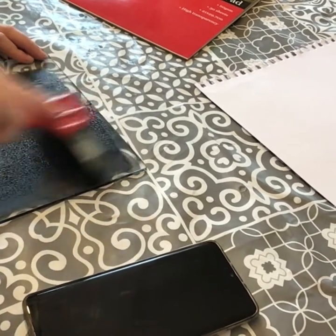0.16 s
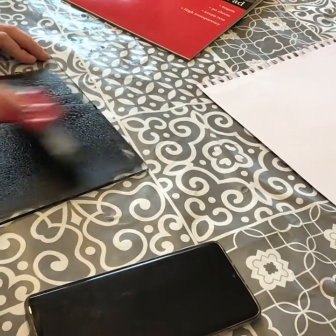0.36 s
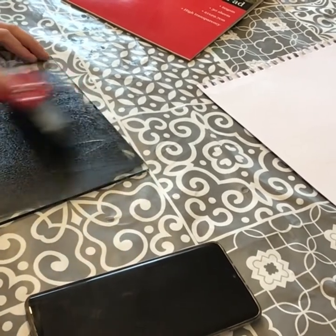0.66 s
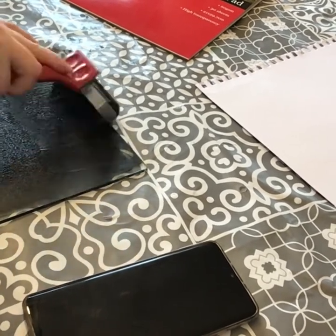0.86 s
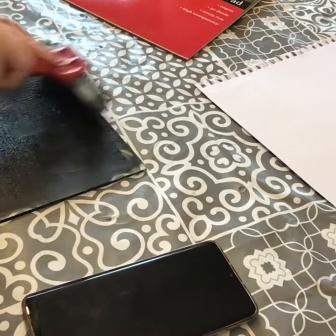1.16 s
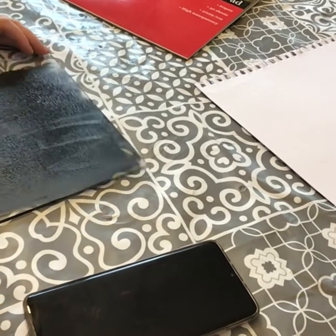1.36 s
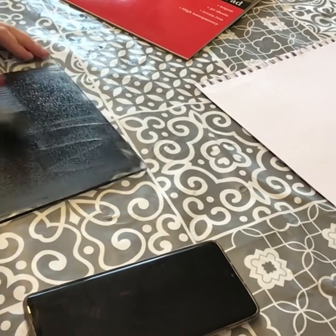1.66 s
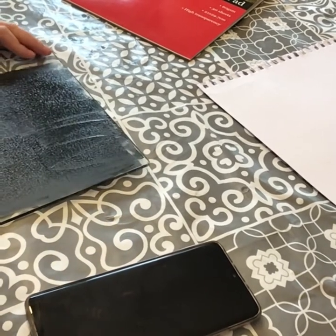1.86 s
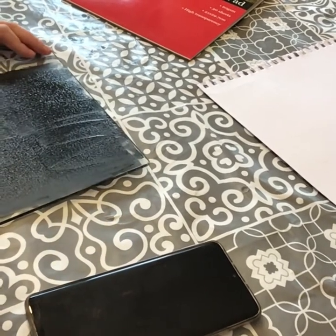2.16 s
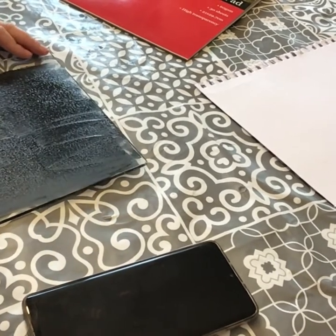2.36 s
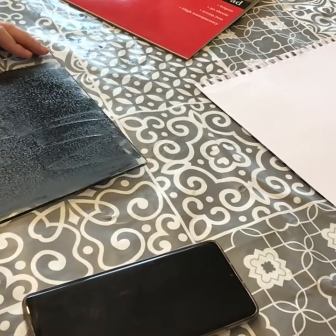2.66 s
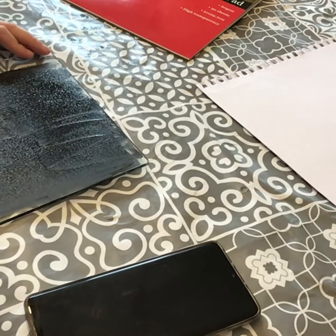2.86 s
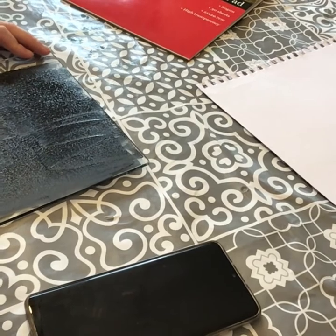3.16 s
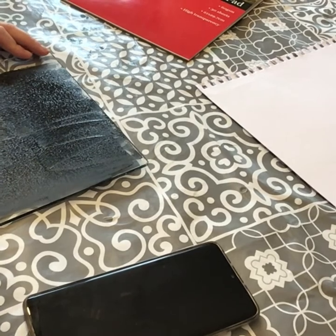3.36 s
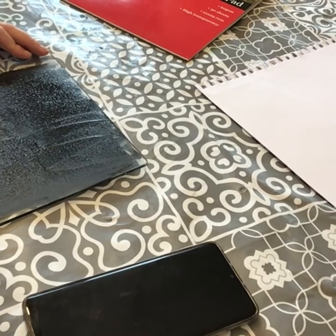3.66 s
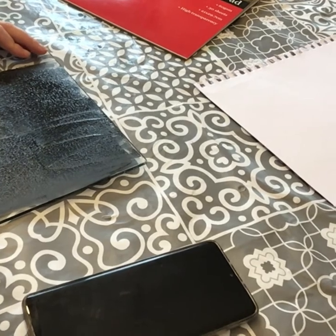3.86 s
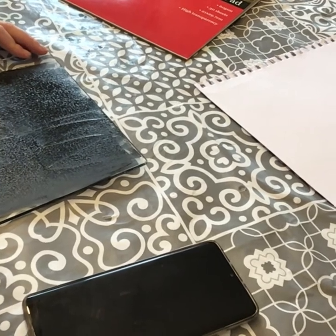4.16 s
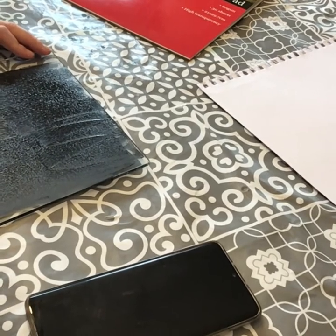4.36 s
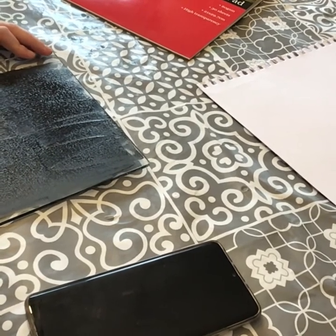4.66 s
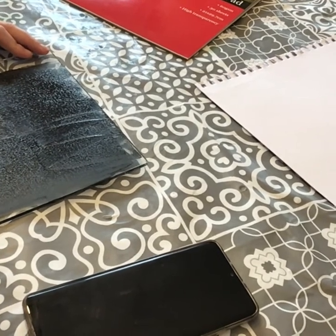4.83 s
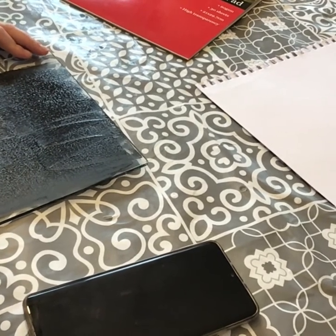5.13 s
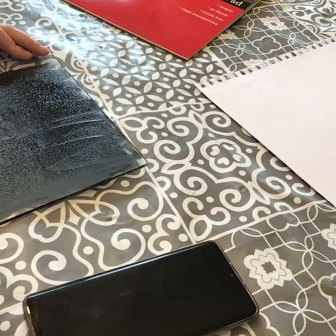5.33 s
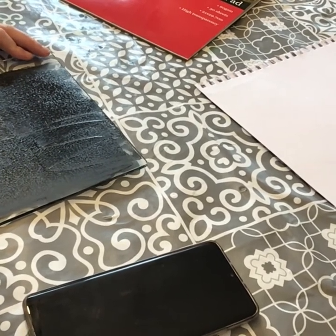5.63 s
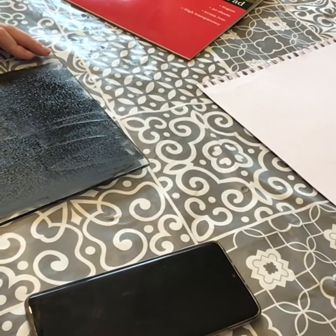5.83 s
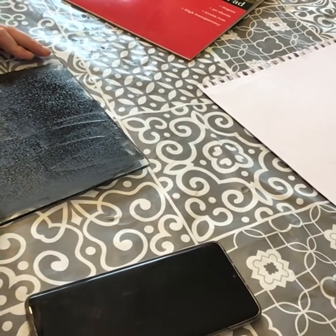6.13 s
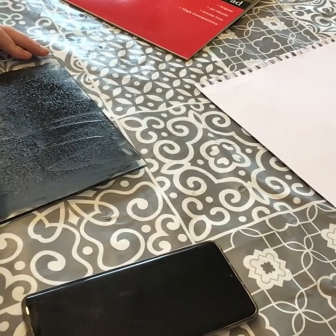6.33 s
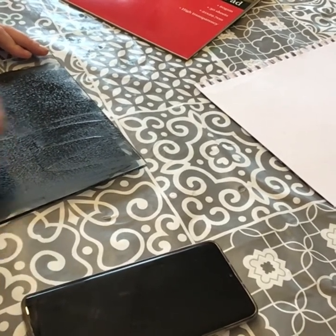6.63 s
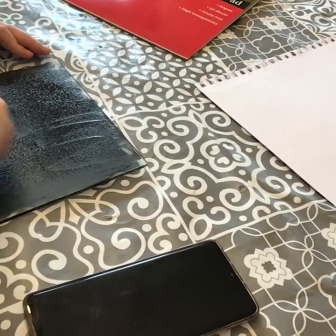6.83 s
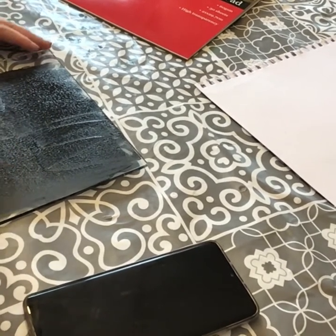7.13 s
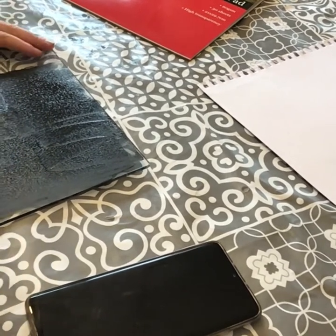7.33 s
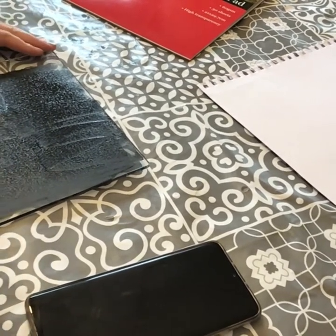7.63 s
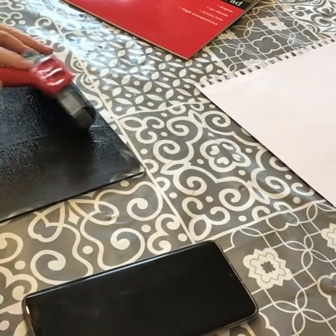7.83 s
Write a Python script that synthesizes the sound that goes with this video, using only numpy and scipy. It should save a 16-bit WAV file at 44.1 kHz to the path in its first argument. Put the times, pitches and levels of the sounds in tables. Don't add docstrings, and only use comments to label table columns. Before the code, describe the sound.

Close to the microphone in a small quiet room, a rubber roller works sticky ink on glass with fast crackling rasps, about six a second. It lifts with tiny ticks, lands with a knock, continues with gradually fainter strokes, pauses, then the handle clacks on the plate, the roller lands again and makes two longer tearing strokes.

```python
import sys
import numpy as np
from scipy import signal
from scipy.fft import rfft, irfft, next_fast_len
from scipy.io import wavfile
from scipy.ndimage import uniform_filter1d, map_coordinates

SR = 44100
rng = np.random.default_rng(int(sys.argv[2]) if len(sys.argv) > 2 else 0)


def to_wav(sig):
    pcm = np.clip(np.atleast_2d(sig), -1, 1) * 32767
    pcm = np.round(pcm).astype(np.int16)
    wavfile.write(sys.argv[1], SR, pcm.T)


def field_ratio(decibels):
    return 10 ** (np.asarray(decibels, dtype=float) / 20)


N = 352359

# f/Hz, width/Hz, level/dB
SLAB = [(171.8, 7.7, 3), (221.7, 12, 2), (255.4, 17, -1), (280, 35.6, -1)]


def unit(x):
    return x / np.sqrt(np.mean(x ** 2) + 1e-20)


def along(points, hz):
    f, v = np.transpose(points)
    return np.interp(np.log(hz + 1), np.log(f + 1), v)


def curves(rows):
    s, *columns = np.transpose(rows)
    return [np.interp(np.arange(N) / SR, s, column) for column in columns]


def wobble(rate):
    knots = rng.standard_normal(int(N * rate / SR) + 4)
    return map_coordinates(knots, [np.arange(N) * rate / SR])


def loudest(levels_db):
    return 10 * np.log10((field_ratio(levels_db) ** 2).sum(axis=0) + 1e-14)


def filtered(x, response):
    m = 2 * next_fast_len(N // 2 + SR // 4)
    return irfft(rfft(x, m) * response(np.fft.rfftfreq(m, 1 / SR)), m)[:N]


def causal(spectrum):
    def response(hz):
        cepstrum = irfft(np.log(field_ratio(along(spectrum, hz)) + 1e-6))
        cepstrum[1:len(hz) - 1] *= 2
        cepstrum[len(hz):] = 0
        return np.exp(rfft(cepstrum))
    return response


def resonant(peaks):
    def response(f):
        total = 0
        for k, (centre, width, db) in enumerate(peaks):
            total = total + (-1) ** k * field_ratio(db) * 1j * f * width / (centre * centre - f * f + 1j * f * width)
        return total
    return response


def bursts(seconds, gains, size=80):
    # f/Hz, scatter as a share
    port = (11590, 0.045)
    # f/Hz, width/Hz, level/dB
    pop_peaks = [(6390, 2120, 5), (14600, 3500, 4)]
    # t/s, pop under the ping level/dB
    tack = [(0, -10.5), (1.5, -7), (3, -7), (4.5, -7.5), (6, -4), (7.99, -7.5)]
    port_hz, scatter = port
    t = np.arange(size) / SR
    shape = 1.9 * (1 - np.exp(-t / .0001)) * np.exp(-t / .0003)
    draw = rng.standard_normal((len(seconds), size + 1))
    ping = np.sin(2 * np.pi * port_hz * np.exp(scatter * draw[:, :1]) * t)
    at = (np.asarray(seconds) * SR).astype(int)[:, None] + np.arange(size)

    def lay(rows):
        snap = gains[:, None] * shape * rows
        return np.bincount(at.ravel(), snap.ravel(), N + SR)[:N]

    pop = filtered(lay(draw[:, 1:]), lambda hz: resonant(pop_peaks)(hz) * hz / (hz - 4500j))
    return lay(ping) + field_ratio(curves(tack)[0]) * pop


def struck(hits, modes, rise_s, crack_s, size=1):
    out, t = np.zeros(N + SR), np.arange(SR // 4) / SR
    for s, db, hard_db, sharp_db in hits:
        ring = np.zeros(len(t))
        for hz, level, t60 in modes:
            mode_db = level + hard_db * np.log2(hz / 1000) + 1.0 * rng.standard_normal()
            ring += field_ratio(mode_db - 60 * t / t60) * np.sin(2 * np.pi * hz * t)
        ring *= 1 - np.exp(-(t / rise_s) ** 2)
        grit = uniform_filter1d(rng.standard_normal(len(t)), size=size) * np.sqrt(size)
        crack = field_ratio(sharp_db - 60 * t / crack_s) * grit
        out[round(s * SR):][:len(t)] += field_ratio(db) * (ring / np.abs(ring).max() + crack)
    return out[:N]


def strokes():
    # t/s, rise/s, hold/s, tearing ink level/dB, frame
    # buzz level/dB
    passes = [(0.002, 0.021, 0.02, -37.5, -54), (0.147, 0.032, 0.025, -37, -53.5),
              (0.315, 0.015, 0.04, -36, -52.5), (0.456, 0.044, 0.004, -30, -51.5),
              (0.603, 0.051, 0.004, -37, -51), (0.768, 0.031, 0.032, -33.0, -54),
              (0.912, 0.015, 0.069, -36, -53), (1.064, 0.072, 0.004, -29.5, -52.5),
              (1.234, 0.023, 0.125, -34.5, -50.5), (1.485, 0.05, 0.036, -37.5, -53),
              (1.657, 0.055, 0.067, -37.5, -50.5), (1.897, 0.051, 0.043, -36, -53),
              (2.106, 0.027, 0.091, -36.5, -51.5), (2.323, 0.014, 0.06, -48.5, -59.5),
              (2.504, 0.041, 0.004, -39.5, -51), (2.615, 0.067, 0.004, -35.5, -51),
              (2.796, 0.0077, 0.035, -32.5, -52), (2.933, 0.065, 0.004, -33, -51.5),
              (3.101, 0.038, 0.008, -33.0, -50), (3.219, 0.079, 0.005, -34.5, -51),
              (3.413, 0.039, 0.004, -31.0, -49.5), (3.558, 0.033, 0.004, -33.5, -49.5),
              (3.734, 0.024, 0.058, -43, -53),
              (4.29, 0.038, 0.042, -34.5, -46.5), (4.457, 0.044, 0.04, -40.5, -49),
                  (4.649, 0.016, 0.064, -35.5, -48), (4.792, 0.042, 0.032, -41.5, -49),
                  (4.971, 0.0274, 0.024, -39.5, -48.5), (5.109, 0.043, 0.038, -40.5, -51),
                  (5.283, 0.032, 0.062, -36.5, -49), (5.497, 0.059, 0.016, -35.5, -48.5),
                  (5.646, 0.032, 0.029, -35, -49.5), (5.795, 0.069, 0.004, -46, -54),
                  (5.924, 0.065, 0.045, -45.5, -56), (6.125, 0.028, 0.014, -44, -54),
                  (6.253, 0.007, 0.052, -48, -58.5), (6.384, 0.032, 0.004, -47, -58),
                  (6.517, 0.043, 0.008, -50, -59.5), (6.632, 0.047, 0.025, -53, -58.5),
                  (6.806, 0.043, 0.006, -48, -56), (6.938, 0.035, 0.065, -45.0, -55.5),
                  (7.594, 0.073, 0.11, -33.5, -50.5), (7.852, 0.06, 0.193, -36.5, -48.5)]
    grip_db, rise_bend = 14.5, 0.58
    bite_db_per_s, sag_db_per_s, fall_db_per_s = 2091.5, 20, 174.5
    stop_db_per_s2 = 1499.5
    frame_swing = 0.75
    early_db = 5.5
    t = np.arange(0, N, 32) / SR
    s, rise, hold, ink_db, frame_db = np.array(passes).T[..., None]
    age = t - s
    late = np.maximum(age - rise - hold, 0)
    to_go = np.clip(1 - age / rise, 0, 1)
    swell_db = bite_db_per_s * np.minimum(age, 0) - grip_db * to_go ** rise_bend
    swell_db -= sag_db_per_s * np.clip(age - rise, 0, hold)
    swell_db -= fall_db_per_s * late + stop_db_per_s2 * late ** 2
    levels = [loudest(ink_db + swell_db), loudest(frame_db + frame_swing * swell_db),
              loudest(swell_db), loudest(ink_db + swell_db + early_db * to_go)]
    return curves(np.transpose([t, *levels]))


def roller(ink_db, frame_db, stray_db):
    # f/Hz, level/dB per Hz
    hiss = [(880, -28), (1500, -8.5), (1940, -14.5), (2540, -13), (3350, -8.5), (4120, -4.5), (4870, -45),
            (6630, -2.5), (9850, 2), (11800, -17), (16000, -1)]
    # f/Hz, width/Hz, level/dB
    frame = [(603, 280, 0), (1046, 243, -2), (1320, 240, 2), (1750, 540, -4.5), (2537, 270, 2),
             (3115, 180, 0), (4095, 540, -1.5)]
    draw = rng.random((20000, 2))
    sizes = field_ratio(-5 * np.log(draw[:, 1] + .05))
    crackle = unit(field_ratio(3.53 * wobble(28)) * bursts(draw[:, 0] * N / SR, sizes))
    fizz = unit(filtered(rng.standard_normal(N), causal(hiss)))
    buzz = unit(filtered(field_ratio(2.3 * wobble(60)) * rng.standard_normal(N), resonant(frame)))
    stray = rng.random((1000, 2))
    thick_db, spread_db = 4.5, 2
    thick = bursts(stray[:, 0] * N / SR, field_ratio(thick_db - spread_db * np.log(stray[:, 1] + 0.022)))
    tearing = field_ratio(ink_db) * (field_ratio(-1.5) * crackle + field_ratio(-11.5) * fizz)
    return tearing + field_ratio(stray_db + 3.9 * wobble(22)) * thick + field_ratio(frame_db - 1.5) * buzz


def snaps():
    # t/s, peak level/dB
    thick_snaps = [(.0453, -19), (.1545, -25), (.1601, -24), (.1793, -20), (.1844, -17), (.2138, -22),
                   (.5054, -16), (.5098, -15), (.7713, -31), (.7808, -22), (.7976, -21), (.9294, -25),
                   (.9571, -22), (1.0154, -25), (1.084, -27), (1.1188, -19), (1.1265, -18), (1.5427, -20),
                   (1.5894, -22), (1.688, -29), (2.1846, -21), (2.3156, -33), (2.3407, -35), (2.3936, -26),
                   (2.5115, -27), (2.7985, -24), (3.111, -26), (3.4429, -24), (3.4652, -16), (3.5746, -26),
                   (3.7425, -34), (3.8029, -24), (4.2963, -26), (4.3145, -24), (4.6619, -29), (4.678, -22),
                   (4.9754, -28), (4.9975, -25), (5.2979, -26), (5.3688, -19), (5.3738, -17), (5.3934, -22),
                   (5.67, -23), (5.9627, -30), (6.2621, -33), (6.2653, -29), (6.3189, -33), (6.324, -33),
                   (6.5472, -38), (6.7334, -43), (6.8035, -32), (6.8243, -33), (6.8443, -32), (6.8509, -29),
                   (7.5797, -26), (7.6188, -29), (7.6419, -25), (7.69, -23), (7.7924, -24), (7.8812, -31)]
    s, db = np.array(thick_snaps).T
    return bursts(s - .00015, field_ratio(db + 1.2))


def knocks():
    # t/s, peak level/dB, hardness/dB per octave, sharp part level/dB, thud level/dB
    landings = [(1.142, -49.5, -34, -26, -13), (2.337, -43, -11, -26, -20), (2.635, -34.5, -1, -28, -19),
                (2.767, -51.5, -5, -26, -24), (2.941, -35.5, -3, -26, -21), (3.254, -40.5, 0, -22, -12),
                (3.786, -32, -2.5, -32, -29), (4.277, -11.5, -2.5, -19.5, -24),
                (6.828, -49.5, -4, -24, -13), (6.955, -39, -4, -40, -14), (7.01, -32, -2.5, -27, -20),
                (7.049, -41.5, -2, -26, -16), (7.579, -13, -4.2, -11.5, -29)]
    # t/s, peak level/dB
    clacks = [
        (7.4652, -11),
    ]
    # f/Hz, level/dB, t60/s
    plate_modes = [(582, -14.5, 0.13), (653, -6.5, 0.068), (778, -9.5, 0.093), (831, -5.5, 0.046),
                   (1050, -4.5, 0.03), (1258, 2.5, 0.032), (1500, 9.5, 0.019), (1640, 11, 0.0091),
                   (2430, 2, 0.0088), (3195, -9, 0.02)]
    # f/Hz, level/dB, t60/s
    handle_modes = [(596, -8.5, 0.054), (657, -24, 0.12), (1800, -8, 0.018), (2400, -6, 0.0085),
                    (2850, 6.5, 0.012), (3700, 6, 0.0076), (5000, 7, 0.0042), (5840, 2, 0.0045)]
    plate = struck([row[:4] for row in landings], plate_modes, rise_s=0.0013, crack_s=0.026)
    blows = np.zeros(N)
    for s, db, *_, thud_db in landings:
        blows[round(s * SR)] = field_ratio(db + thud_db + 47.0)
    clack = struck([(*clacks[0], .1, -6)], handle_modes, rise_s=0.00046, crack_s=0.013, size=5)
    return plate + filtered(blows, resonant(SLAB)) + clack


def ticks():
    # t/s, peak level/dB, f/Hz, ring over the puff level/dB
    touches = [(0.285, -51, 2720, -6), (3.729, -47.5, 2480, -4), (3.95, -46.5, 1750, -1),
               (3.975, -40.5, 1800, -1), (3.98, -37, 2850, -2.5), (3.987, -37.5, 6290, 6),
               (4.049, -43, 2600, 2), (4.098, -63, 6200, 0), (4.266, -60, 5100, 1), (6.734, -65, 4000, -3),
               (6.853, -40.5, 5370, 0), (7.212, -49, 5500, -12), (7.239, -53, 3480, -3),
               (7.289, -43.5, 2600, -3), (7.318, -48.5, 1680, -4), (7.349, -52, 1800, -8),
               (7.377, -45.5, 2390, -9), (7.458, -54, 3700, 9), (7.545, -27, 2630, -10)]
    grip_hz = 897
    out, t = np.zeros(N + SR), np.arange(1800) / SR
    for s, db, hz, ring_db in touches:
        puff = uniform_filter1d(rng.standard_normal(len(t)), size=10) * np.cos(2 * np.pi * hz * t)
        ping = field_ratio(ring_db) * np.sin(2 * np.pi * hz * t)
        hollow = 0.21 * field_ratio(-60 * t / 0.032) * np.sin(2 * np.pi * grip_hz * t)
        tick = field_ratio(-60 * t * (hz / 1800) ** 2 / 0.041) * ping + hollow + 3 * field_ratio(-60 * t / 0.013) * puff
        out[round(s * SR):][:len(t)] += field_ratio(db + 2.0) * (1 - np.exp(-t / 0.0001)) * tick
    return out[:N]


def table(swell_db):
    # f/Hz, width/Hz, level/dB
    table_top = [(62, 14.3, -8), (125, 37.4, -4), (133.3, 21.2, -0.5)]
    # t/s, table boom level/dB, plate rumble level/dB
    lean = [(0, -71.5, -66), (.8, -57.5, -69), (1.2, -57, -59), (2.1, -62, -62), (2.5, -63, -59),
            (3.3, -64, -59), (4.2, -62.5, -58), (5.6, -62.5, -55), (6.2, -67.5, -67), (7.3, -63.5, -72),
            (7.99, -64.5, -61.5)]
    # t/s, table boom level/dB, plate rumble level/dB
    jolts = [(.01, -55, -72), (.98, -60, -58), (1.4, -40.5, -65), (1.59, -45.5, -66), (1.74, -38, -62),
             (1.88, -46, -66), (2.16, -48, -56), (2.34, -54, -68), (2.87, -54.5, -50), (4.29, -42.5, -45),
             (4.53, -54, -51.5), (4.71, -53, -46), (7.1, -54.5, -69), (7.475, -55, -48), (7.59, -55, -41),
             (7.81, -43.5, -71)]
    rise_db_per_s, fall_db_per_s = 607, 142
    table_swing, plate_swing = 0.12, 0.45

    def hum(body):
        noise = rng.standard_normal(N)
        return unit(filtered(noise, lambda hz: resonant(body)(hz) * (hz / (hz - 45j)) ** 3))

    s, boom_jolts, rumble_jolts = np.transpose(jolts)[..., None]
    t = np.arange(0, N, 64) / SR
    shove_db = np.minimum(rise_db_per_s * (t - s), -fall_db_per_s * (t - s))
    boom_shove, rumble_shove = curves(np.transpose(
        [t, loudest(boom_jolts + shove_db), loudest(rumble_jolts + shove_db)]))
    boom_lean, rumble_lean = curves(lean)
    boom_db = loudest(np.array([boom_shove, boom_lean + table_swing * swell_db]))
    rumble_db = loudest(np.array([rumble_shove, rumble_lean + plate_swing * swell_db]))
    boom = field_ratio(boom_db - 1.5 + 2.2 * wobble(9)) * hum(table_top)
    return boom + field_ratio(rumble_db - 2.5) * hum(SLAB)


def room(x):
    # f/Hz, t60/s
    decay = [(150, 0.57), (780, 0.51), (1500, 0.32), (4000, 0.35), (12000, 0.28)]
    out, step = np.zeros(N + SR), SR // 4
    for start in range(0, N, step):
        hz, t, z = signal.stft(rng.standard_normal(SR // 2), SR, nperseg=256)
        fade = field_ratio(-60 * t / along(decay, hz)[:, None])
        tail = signal.istft(z * fade, SR, nperseg=256)[1]
        wet = signal.fftconvolve(x[start:start + step], tail / np.linalg.norm(tail))
        piece = out[start + 130:][:len(wet)]
        piece += wet[:len(piece)]
    return out[:N]


def quiet():
    # f/Hz, rms level/dB
    mains = [(50.2, -83), (101, -70.5)]
    # f/Hz, level/dB per Hz
    air = [(15, -47.5), (25, -25.5), (102, -10.5), (161, -28), (256, -20.5), (363, -24.5), (394, -32),
           (775, -29), (1790, -30.5), (16000, -44.5)]
    t, drift = np.arange(N) / SR, wobble(3.5)
    hum = np.zeros(N)
    for hz, db in mains:
        hum += field_ratio(db + 5.0 + 1.1 * drift) * np.sin(2 * np.pi * hz * t + 1.5 * drift)
    tone = unit(filtered(rng.standard_normal(N), lambda hz: field_ratio(along(air, hz))))
    return hum + field_ratio(-60 - 4.5) * tone


def scene():
    ink_db, frame_db, swell_db, stray_db = strokes()
    near = roller(ink_db, frame_db, stray_db) + snaps()
    soft = lambda hz: 1 / (1 + 1j * hz / 8500) ** 2
    hits, small = filtered(knocks(), soft), filtered(ticks(), soft)
    wet = room(field_ratio(-9) * near + field_ratio(-5.5) * hits + field_ratio(-7.0) * small)
    return (near + hits + small + table(swell_db) + wet + quiet())[None]


def low_pass(x):
    return signal.sosfilt(signal.butter(12, 17050, fs=SR, output="sos"), x)


def record(dry):
    # f/Hz, width/Hz, depth (0-1)
    shadow = (10175, 996, 0.62)
    centre_hz, width_hz, depth = shadow
    top_hz = 15760

    def microphone(hz):
        dip = 1 - depth * np.exp(-((hz - centre_hz) / width_hz) ** 2)
        return dip * np.where(hz < top_hz, 1, field_ratio(-52.0))

    limited = filtered(dry[0], microphone)
    return low_pass(limited[None])


dry = scene()
out = record(dry)
to_wav(out)
```